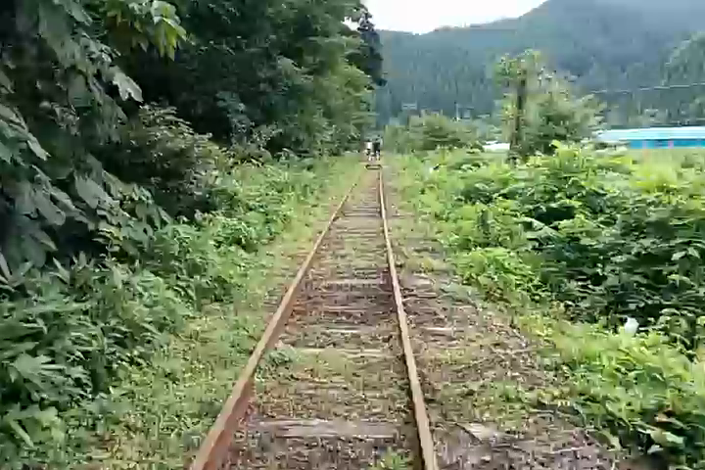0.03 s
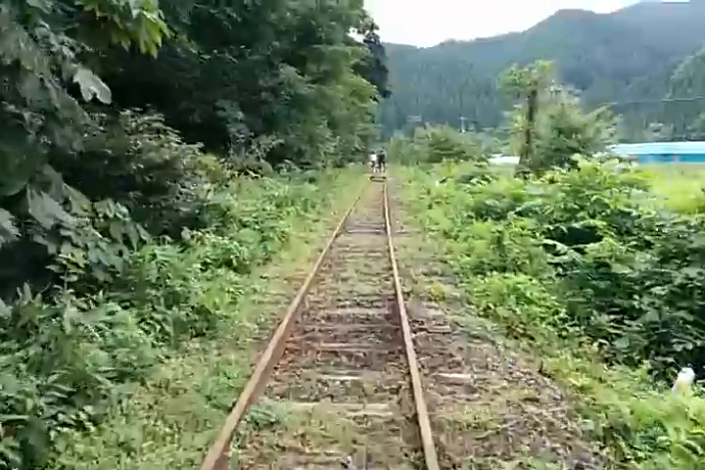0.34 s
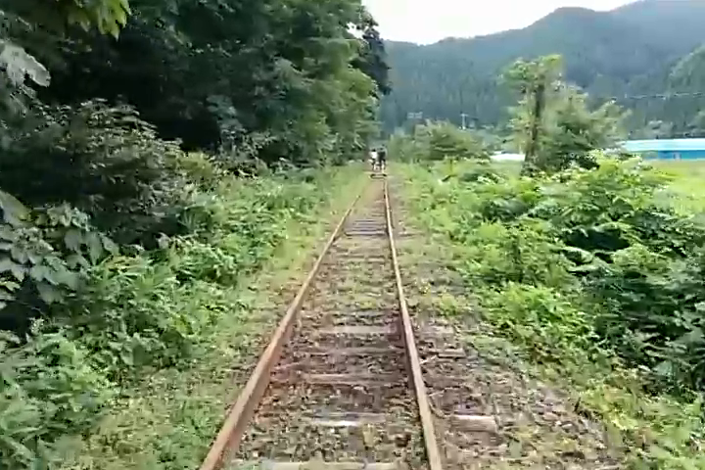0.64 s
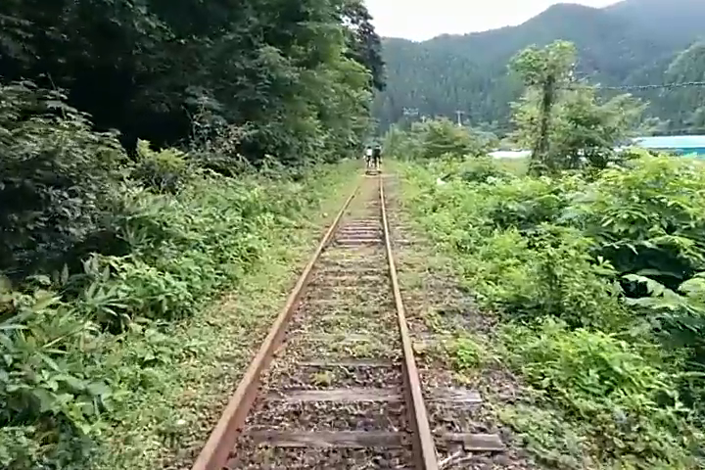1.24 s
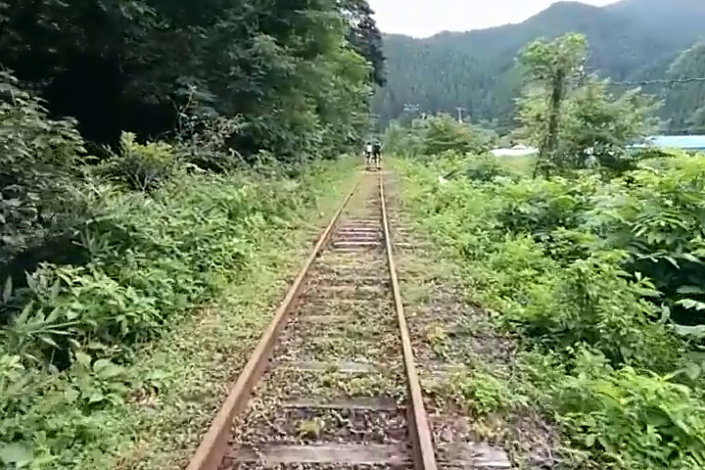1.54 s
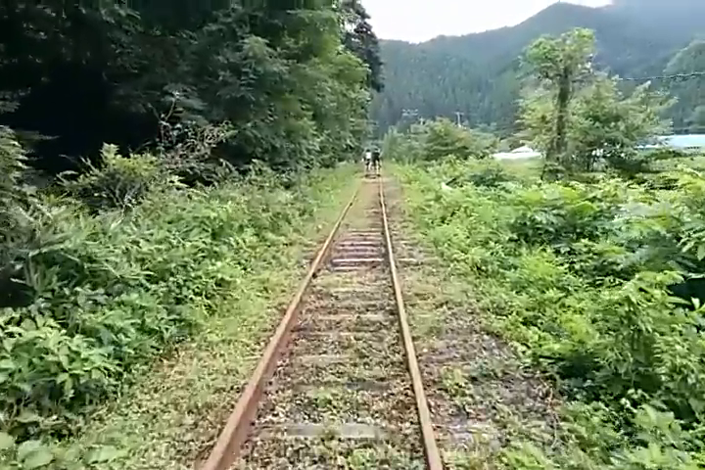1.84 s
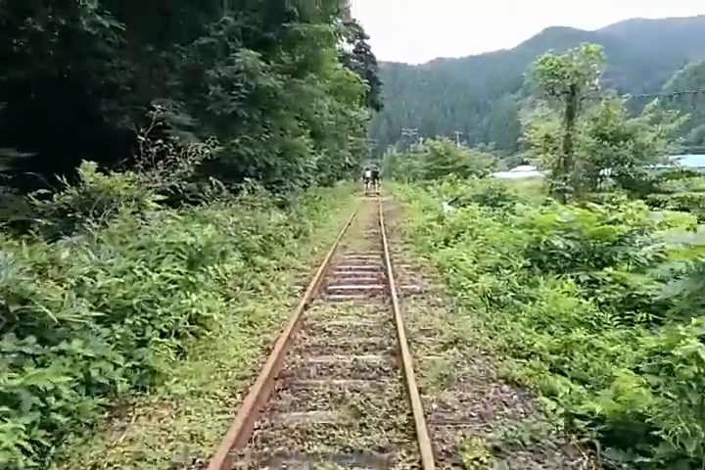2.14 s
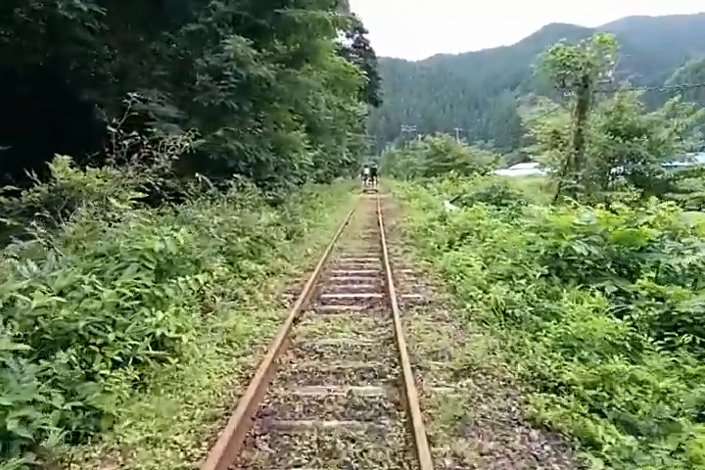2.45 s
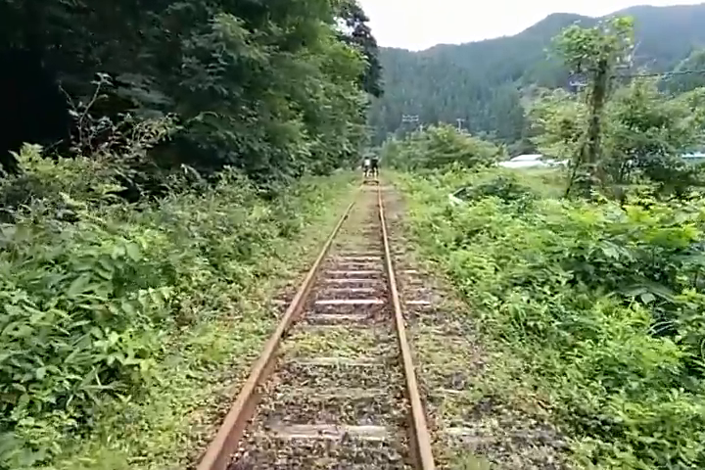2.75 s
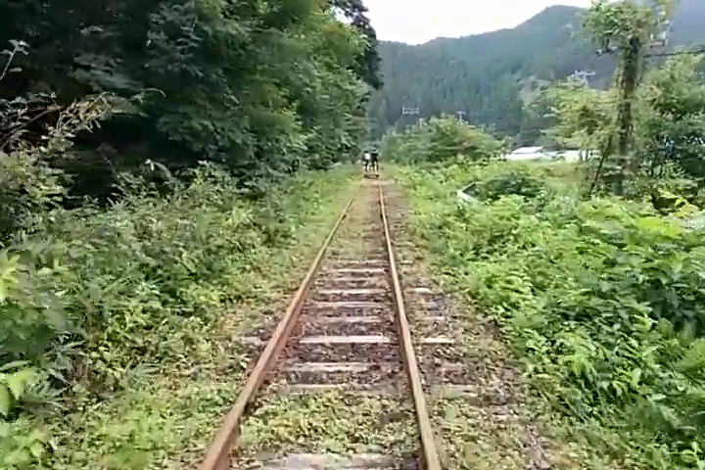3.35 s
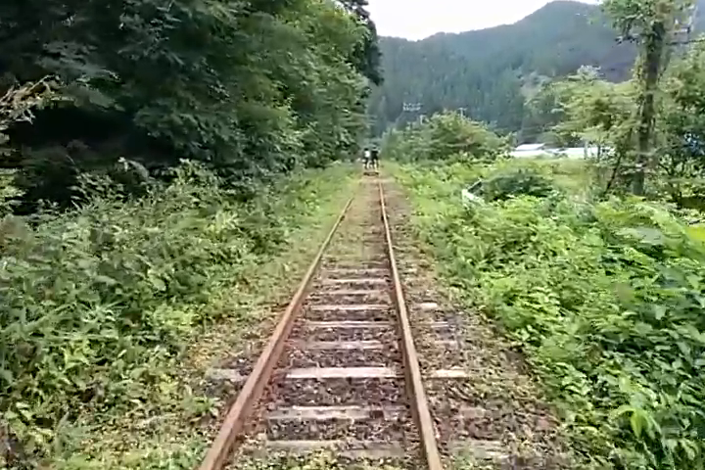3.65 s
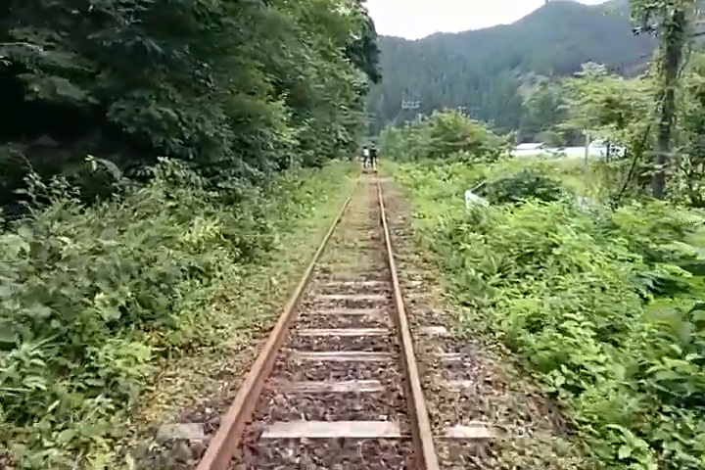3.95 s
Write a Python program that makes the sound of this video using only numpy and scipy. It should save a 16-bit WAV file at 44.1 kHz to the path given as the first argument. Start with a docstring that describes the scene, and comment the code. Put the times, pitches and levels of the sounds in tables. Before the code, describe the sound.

A rail bike rolls along rough track outdoors, heard from the seat as a wavering drone. Early on, two wheels clack over a joint, ringing and rattling. Loose fittings clink, wind hisses in gusts, and a lighter clatter comes last.

```python
"""A rail bike rolls along a rusty, overgrown track, heard from the seat. From the start, rough rail
forces the frame to drone and the steel wheels to sing faintly; soon loose fittings clink and wind
hisses past in short gusts. At about 0.5 s and 1 s the front and rear wheels strike one joint, and
each impact leaves the steel ringing and the frame rattling. Later the wind now and then thumps the
microphone. Near 3.7 s comes a lighter clatter, with a thin, ringing hiss in its wake."""
import sys
import numpy as np
from scipy import signal
from scipy.fft import rfft, irfft, next_fast_len
from scipy.io import wavfile
from scipy.ndimage import map_coordinates

SR = 44100
rng = np.random.default_rng(int(sys.argv[2]) if len(sys.argv) > 2 else 0)


def persist_wave(psi):
    """Save psi, clipped to +-1, as 16-bit WAV."""
    counts = np.round(np.clip(psi, -1, 1) * 32767).astype(np.int16)
    wavfile.write(sys.argv[1], SR, np.atleast_2d(counts).T)


N = 176400

# strength of the frame's drone: time_s, level_db
DRONE_LEVEL = [(.1, -49.5), (.18, -30), (.32, -28), (.39, -19.5), (.48, -19), (.68, -22.5), (.78, -17.5),
               (.92, -22), (1.02, -16), (1.16, -23), (1.27, -19.5), (1.43, -24), (1.57, -20), (1.7, -27),
               (1.97, -29), (2.14, -23), (2.36, -20.5), (2.45, -21.5), (2.6, -20.5), (2.85, -21),
               (3.02, -20.5), (3.13, -22.5), (3.28, -16), (3.47, -21), (3.7, -23), (3.8, -19.5),
               (3.88, -28), (4, -21)]
# centre of the hum: time_s, pitch_hz
DRONE_PITCH = [(0, 429.2), (.4, 406.2), (1, 395), (1.35, 431.1), (1.75, 416.9), (2.15, 487), (2.6, 484),
               (2.85, 457), (3.15, 482), (3.5, 446), (3.8, 438.6), (4, 458)]
# low roar relative to the drone: time_s, gain_db
ROAR_GAIN = [(0, -4.5), (.45, -9), (.62, -2.5), (1, -7.5), (1.35, -6), (1.7, -2), (2.1, -7.5), (2.35, -5),
             (2.8, -6), (3.2, -11), (3.8, -0.5), (4, -6)]
# broad response of the frame: frequency_hz, gain_db
FRAME_SPECTRUM = [(25, -49), (55, -36), (110, -31.5), (170, -21.5), (240, -4.5), (320, -2.5), (410, -0.5),
                  (520, -0.5), (620, -3), (760, -17.5), (1100, -22), (2000, -64)]
# grinding of the treads: time_s, level_db
GRIND_LEVEL = [(.1, -55.5), (.27, -42), (.45, -35), (.8, -32.5), (1.1, -33), (1.35, -34), (1.55, -37),
               (1.7, -37), (1.95, -33), (2.2, -33), (2.4, -30), (2.55, -31.5), (2.8, -30), (3.2, -29),
               (3.45, -29), (3.65, -29.5), (3.76, -25.5), (3.88, -29.5), (4, -25.5)]
# colour of the grinding: frequency_hz, gain_db
TREAD_SPECTRUM = [(400, -17.5), (750, 5), (1000, 0), (1350, -3.5), (1850, -4.5), (2150, -14.5), (2600, -12),
                  (3100, -12.5), (3800, -15), (4500, -23), (6000, -26.5), (15000, -54)]
# natural modes of a wheel: pitch_hz, struck_gain_db, t60_s, rolling_gain_db
WHEEL_MODES = [(1560, -10, 0.27, -1.5), (1936, 4.5, 0.21, 2), (2432, 5, 0.13, 5), (2837, -22, 0.054, 5),
               (2960, -21, 0.086, -2), (3510, -8, 0.25, -9.5)]
# steady airstream: time_s, level_db
AIR_LEVEL = [(.1, -72), (.15, -56), (.27, -53), (.7, -51), (1.15, -54.5), (1.3, -62.5), (1.55, -68),
             (1.8, -71), (1.83, -56.5), (2.4, -57), (2.9, -52.5), (3.2, -59.5), (3.48, -64.5),
             (3.67, -60.5), (4, -61)]
# colour of the airstream: frequency_hz, gain_db
AIR_SPECTRUM = [(3500, -21), (5000, -13), (6500, -1.5), (7700, 7), (9500, -1), (12000, -7), (15500, -11.5)]
# steady wind rumble: time_s, level_db
RUMBLE_LEVEL = [(.3, -63), (.7, -51), (1.35, -54.5), (1.6, -50), (2.4, -53), (3, -46), (4, -49.5)]
# wind thumps: start_s, hold_s, level_db
WIND_THUMPS = [(1.682, 0.043, -48.5), (2.06, 0.079, -47), (2.852, 0.044, -38.5), (3.185, 0.047, -48),
               (3.792, 0.043, -33.5)]
# colour of rumble and thumps: frequency_hz, gain_db
BUFFET_SPECTRUM = [(20, -29), (38, -21.5), (58, 1.5), (110, 0), (170, 3), (500, -53)]
# narrow dip in the treble: time_s, centre_hz
DIP_CENTRE = [(0, 5070), (.4, 5100), (.8, 4750), (1.3, 4210), (1.9, 4670), (3.1, 4460), (3.8, 5060)]
# clinks of loose metal: start_s, level_db, pitch_hz
FITTING_CLINKS = [(.238, -29, 975), (0.263, -31.5, 2440), (.385, -35, 1950), (.483, -31, 2420),
                  (0.767, -26.5, 1275), (.886, -25, 900), (1.012, -26, 1645), (1.285, -20.5, 972),
                  (1.676, -32.5, 2820), (2.386, -26, 1786), (2.405, -36, 3640), (2.789, -23, 967),
                  (2.896, -27.5, 2790), (2.934, -22, 824), (3.725, -20, 1149), (3.745, -31, 1604),
                  (3.752, -38, 2611), (3.964, -23, 971), (3.968, -32, 1733), (3.976, -33, 2725)]
# hissing gusts: start_s, hold_s, level_db, sag_db_per_s
WIND_GUSTS = [(0.29, 0.24, -42.5, 8), (0.514, 0.098, -30.5, 43), (0.603, 0.13, -38, 69),
              (0.752, 0.12, -46.5, 30), (0.898, 0.05, -51.5, 23), (0.96, 0.083, -36, 22.5),
              (1.033, .1, -40, 69.5), (1.966, 0.01, -44.5, 29.5), (2.395, 0.031, -44, 36),
              (2.427, 0.034, -47, 18), (2.568, 0.093, -42.5, 27.5), (2.659, 0.068, -43, 35),
              (2.767, 0.13, -44, 6), (2.888, .055, -48, 32.5), (3.001, 0.026, -35.5, 17.5),
              (3.031, 0.046, -39, 18.5), (3.07, 0.034, -43, 43), (3.286, 0.073, -43, 12),
              (3.512, 0.068, -50.5, 21.5), (3.713, 0.02, -47, -5), (3.765, 0.22, -52, 53),
              (3.886, 0.018, -41.5, 14)]
# colour of gusts and ticks: frequency_hz, gain_db
HISS_SPECTRUM = [(2500, -17), (4300, -6), (5200, -6.5), (6200, -6.5), (7800, 2.5), (10000, 0.5),
                 (12500, -7.5), (15500, -10)]
# tiny high ticks: start_s, level_db
HIGH_TICKS = [(.345, -42), (1.985, -46), (2.275, -50), (2.411, -38.5), (3.021, -39), (3.728, -39.5),
              (3.79, -39)]
# small bumps in the rail: start_s, hold_s, level_db, pitch_hz
RAIL_BUMPS = [(.359, 0.0068, -16, 365), (.427, 0.0056, -11.5, 437), (.444, .016, -11, 423),
              (.601, 0.0059, -12.5, 462), (.75, 0.013, -18.5, 400), (.779, 0.011, -12, 413),
              (.824, 0.0063, -15.5, 436), (.847, 0.0056, -11.5, 367), (1.022, 0.014, -12, 365),
              (1.09, 0.011, -10, 441), (1.236, 0.017, -21, 396), (1.288, 0.0073, -31, 430),
              (1.356, 0.0051, -11, 428), (1.508, 0.0074, -13, 463), (1.545, 0.0039, -6.5, 462),
              (1.561, .016, -21.5, 398), (1.601, 0.0058, -15.5, 457), (1.805, .009, -17.5, 342),
              (1.894, 0.0088, -18, 455), (2.117, 0.02, -16, 450), (2.192, 0.0081, -16.5, 494),
              (2.262, 0.014, -19.5, 328), (2.321, .016, -11.5, 496.7), (2.387, 0.0087, -11.5, 400),
              (2.492, .015, -13, 488), (2.515, 0.0051, -12, 493), (2.596, 0.0073, -12.5, 430),
              (2.715, 0.0048, -11.5, 449.4), (2.773, 0.011, -16.5, 412), (2.905, 0.0073, -13.5, 453),
              (2.945, 0.008, -11.5, 454), (3.047, 0.014, -12, 487), (3.1, 0.025, -11.5, 461),
              (3.141, .017, -7.5, 490), (3.351, .015, -13, 467.3), (3.506, 0.024, -20, 449),
              (3.558, 0.0077, -9, 446), (3.595, 0.0052, -10.5, 421), (3.619, 0.015, -15, 358),
              (3.691, .008, -10.5, 402), (3.759, 0.0047, -6, 450), (3.78, 0.019, -13, 423),
              (3.809, 0.007, -9, 445)]
# two clacks at the joint, then a lighter clatter: start_s, blow_db, ring_db, rattle_db, thud_db
IMPACTS = [(0.5193, -11.5, -36, -28.5, -14.5), (.961, -12.5, -31.5, -30.5, -18),
           (3.724, -20.5, -36.5, -39.5, -38)]
# colour of the blow: frequency_hz, gain_db
BLOW_SPECTRUM = [(30, -23.5), (120, -12), (260, 14), (400, 13), (650, 0.5), (1400, -9), (2700, -11.5),
                 (4000, -31), (8000, -36.5), (15000, -36)]
# colour of the frame's rattle: frequency_hz, gain_db
RATTLE_SPECTRUM = [(300, -21), (800, 1.5), (1500, 4), (2100, -10.5), (2600, -4.5), (3600, -3.5),
                   (4700, -20.5), (6000, -14), (7500, -14), (15000, -41)]
# bright ping of the rear wheel: pitch_hz, level_db, t60_s
PING_MODES = [(4660, -33, 0.055), (6720, -37, 0.18), (9000, -37, 0.065)]
# loose parts falling back: start_s, level_db
PART_REBOUNDS = [(0.527, -28), (0.544, -34), (.564, -32), (.589, -32), (0.609, -33), (.977, -32.5),
                 (1.011, -33)]
# colour of the rebounds: frequency_hz, gain_db
REBOUND_SPECTRUM = [(700, -9), (1600, 1), (2100, 0), (2700, 6.5), (3700, -4.5), (4800, -11.5), (6300, -2),
                    (9000, -15.5), (15000, -17)]
# ringing hiss at the last clatter: time_s, level_db
RINGING_HISS_LEVEL = [(3.67, -84), (3.7, -50.5), (3.735, -33), (3.77, -47), (3.795, -41.5), (3.87, -56.5),
                      (3.91, -55.5), (4, -47.5)]
# colour of that hiss: frequency_hz, gain_db
RINGING_HISS_SPECTRUM = [(4000, -18), (5100, -10.5), (5950, 10.5), (6500, -2), (7100, -8), (8300, 5.5),
                         (9500, -4), (11000, 1), (12500, -9), (15500, -7.5)]


def amp(db):
    """Decibels to amplitude ratio."""
    return 10 ** (np.asarray(db) / 20)


def unit(x):
    """Scale to rms 1."""
    return x / np.sqrt(np.mean(x ** 2) + 1e-20)


def clock():
    """Time of every sample in seconds."""
    return np.arange(N) / SR


def curve(rows):
    """Linear interpolation of (time_s, value) points at every sample."""
    return np.interp(clock(), *np.transpose(rows))


def wobble(rate):
    """Smooth random modulation: a spline through rate knots a second."""
    return map_coordinates(rng.standard_normal(int(N * rate / SR) + 4), [np.arange(N) * rate / SR])


def filtered(x, response):
    """Linear filtering: the spectrum of x times a frequency response."""
    size = next_fast_len(N + SR // 2)
    return irfft(rfft(x, size) * response(np.fft.rfftfreq(size, 1 / SR)), size)[:N]


def coloured(x, spectrum):
    """Spectral shaping by (frequency_hz, gain_db) points; rms 1."""
    knots_hz, db = np.transpose(spectrum)
    return unit(filtered(x, lambda hz: amp(np.interp(np.log(hz + 1), np.log(knots_hz), db))))


def noise(spectrum):
    """Coloured Gaussian noise; rms 1."""
    return coloured(rng.standard_normal(N), spectrum)


def resonance(hz, half_width_hz):
    """A resonance under random excitation gives narrow-band noise; rms 1."""
    return unit(filtered(rng.standard_normal(N), lambda f: 1 / (1 + ((f - hz) / half_width_hz) ** 2)))


def grit(per_s, spread_db, smooth):
    """Shot noise: tiny random impacts over a share of smooth noise; rms 1."""
    hits = (rng.random(N) < per_s / SR) * np.sign(rng.standard_normal(N))
    sizes = amp(spread_db * np.clip(rng.standard_normal(N), -2, 2))
    return unit(unit(hits * sizes) + smooth * rng.standard_normal(N))


def envelope(start, rise, hold, t60):
    """Linear rise, with exponential decay from start + hold; all in seconds."""
    t = clock() - start
    return np.clip(t / rise, 0, 1) * amp(-60 * np.maximum(t - hold, 0) / t60)


def tone(start, hz, jitter_rad=0):
    """A sinusoid; phase jitter broadens its spectral line."""
    return np.sin(2 * np.pi * hz * (clock() - start) + jitter_rad)


def chinks(pitches, t60, spread_db, rise=0.006):
    """Damped oscillations, one per pitch in turn, scattered in time and size; rms 1."""
    t = np.arange(SR // 16) / SR
    count = len(pitches)
    size, phase, delay = np.hsplit(rng.random((count, 3)), 3)
    envelopes = amp(spread_db * size - 60 * t / t60) * (1 - np.exp(-t / rise))
    rings = envelopes * np.sin(2 * np.pi * (pitches[:, None] * t + phase))
    starts = ((np.arange(count)[:, None] + 2 * delay) * N / count).astype(int)
    return unit(np.bincount((starts + np.arange(len(t))).ravel(), rings.ravel(), N)[:N])


def frame_drone(half_width_hz=32, skirt_hz=110, scatter_hz=58, ring_count=300):
    """Forced vibration: rough rail drives a wandering hum, short rings around it and a broad roar."""
    centre_hz = curve(DRONE_PITCH)
    phase = 2 * np.pi * np.cumsum(centre_hz) / SR
    lowpass = lambda hz: 1 / (1 + 1j * hz / half_width_hz) / (1 + (hz / skirt_hz) ** 4)
    sway = [unit(filtered(rng.standard_normal(N), lowpass)) for _ in range(2)]
    hum = unit(sway[0] * np.cos(phase) + sway[1] * np.sin(phase))
    detune_hz = scatter_hz * rng.standard_normal(ring_count)
    pitches = centre_hz[np.arange(ring_count) * N // ring_count] + detune_hz
    rings = chinks(pitches, t60=0.13, spread_db=9)
    roar = coloured(grit(per_s=260, spread_db=3.5, smooth=0.98), FRAME_SPECTRUM)
    gain = amp(curve(DRONE_LEVEL) + 1.7 * wobble(50))
    return gain * (amp(-8.5) * hum + amp(-3) * rings + amp(curve(ROAR_GAIN)) * roar)


def treads(detune=0.0265):
    """Rolling contact: grit crunches, loose metal chatters, and the wheel modes chink and sing."""
    grains = grit(per_s=450, spread_db=-0.5, smooth=0.76)
    crunch = coloured(grains * amp(1.3 * wobble(70)), TREAD_SPECTRUM)
    loose_metal = chinks(rng.uniform(661, 4300, size=2600), t60=0.05, spread_db=13)
    chatter = coloured(loose_metal, TREAD_SPECTRUM)
    chink = unit(sum(amp(db) * chinks(hz * (1 + detune * rng.standard_normal(170)), 0.042, spread_db=11)
                     for hz, _, _, db in WHEEL_MODES))
    sing = unit(sum(amp(db + 8.7 * wobble(22.026)) * resonance(hz, half_width_hz=83)
                    for hz, _, _, db in WHEEL_MODES))
    gain = amp(curve(GRIND_LEVEL) + 1.9 * wobble(24.665))
    return gain * (amp(-9) * crunch + amp(-5) * chatter + amp(-12.5) * chink + amp(-15.5) * sing)


def airstream():
    """Flow noise: passing air makes a thin, fluttering hiss."""
    return amp(curve(AIR_LEVEL) + 2.4 * wobble(60)) * noise(AIR_SPECTRUM)


def buffeting():
    """Pressure fluctuations of wind on the microphone give a low rumble and occasional thumps."""
    thumps = sum(amp(db) * envelope(start, 0.005, hold, t60=0.21) for start, hold, db in WIND_THUMPS)
    return (amp(curve(RUMBLE_LEVEL)) + thumps) * noise(BUFFET_SPECTRUM)


def treble_dip(x, half_width_hz=626, centre_db=-11):
    """Band rejection: a slowly drifting notch separates the rolling from the hiss."""
    hz, t, spectra = signal.stft(x, SR, nperseg=512)
    offset = (hz[:, None] - np.interp(t, *np.transpose(DIP_CENTRE))) / half_width_hz
    return signal.istft(spectra * amp(centre_db * np.exp(-offset ** 2)), SR, nperseg=512)[1][:N]


def clinks():
    """Free vibration: loose fittings ring briefly, each at its own pitch."""
    jitter_rad = 0.5 * wobble(250)
    return sum(amp(db) * envelope(start, rise=0.006, hold=0.0052, t60=0.082) * tone(start, hz, jitter_rad)
               for start, db, hz in FITTING_CLINKS)


def gusts(flutter_db=1.2):
    """Incoherent addition: gusts sum in power, rustling with fine crackle and tiny high rings."""
    power = np.zeros(N)
    for start, hold, db, sag_db_per_s in WIND_GUSTS:
        level_db = db - sag_db_per_s * np.clip(clock() - start, 0, hold)
        power += (amp(level_db) * envelope(start, 0.028, hold, t60=0.11)) ** 2
    flutter = amp(flutter_db * (wobble(45) + wobble(170)))
    rings = chinks(rng.uniform(5500, 14000, size=1600), t60=0.035, spread_db=12)
    crackle = grit(per_s=1500, spread_db=3, smooth=0.9)
    return np.sqrt(power) * flutter * coloured(crackle + 0.5 * rings, HISS_SPECTRUM)


def ticks():
    """Transients: very short bursts of high noise are heard as dry ticks."""
    bursts = sum(amp(db) * envelope(start, rise=0.001, hold=0.0023, t60=0.036) for start, db in HIGH_TICKS)
    return bursts * noise(HISS_SPECTRUM)


def bumps():
    """Impulse response: each small bump in the rail draws a heavily damped knock from the frame."""
    jitter_rad = 0.59 * wobble(60)
    return sum(amp(db) * envelope(start, 0.0044, hold, t60=0.032) * tone(start, hz, jitter_rad)
               for start, hold, db, hz in RAIL_BUMPS)


def steel_ring(start, hz, rise, hold, t60):
    """Modal decay: one mode of a struck wheel dies away, roughened by phase jitter."""
    return envelope(start, rise, hold, t60) * tone(start, hz, jitter_rad=0.7 * wobble(280))


def clacks():
    """Impact excitation: a wheel's blow brings a thud, a rattling frame and ringing steel."""
    out = np.zeros(N)
    wash = noise(RATTLE_SPECTRUM)
    contacts = chinks(rng.uniform(640, 4133, size=2400), t60=0.02, spread_db=8, rise=0.00042)
    rattle = unit(wash + coloured(contacts, RATTLE_SPECTRUM))
    for start, blow_db, ring_db, rattle_db, thud_db in IMPACTS:
        out += amp(blow_db) * envelope(start, rise=0.0011, hold=0.0087, t60=0.097) * noise(BLOW_SPECTRUM)
        out += amp(thud_db) * envelope(start, rise=0.0012, hold=0.0078, t60=0.083) * tone(start, hz=249)
        out += amp(rattle_db) * envelope(start, rise=0.0033, hold=0.073, t60=0.51) * rattle
        for hz, mode_db, t60, _ in WHEEL_MODES:
            gain = amp(ring_db + mode_db + rng.normal(0, 1))
            out += gain * steel_ring(start, hz, rise=0.011, hold=0.019, t60=t60)
    return out


def rebounds():
    """Secondary impacts: loose parts fall back with bright knocks after both clacks at the joint."""
    bursts = sum(amp(db) * envelope(start, rise=0.0012, hold=0.0039, t60=0.081)
                 for start, db in PART_REBOUNDS)
    return bursts * noise(REBOUND_SPECTRUM)


def rear_wheel_landing(ping_s=0.96, jolt_s=0.9635):
    """Shock excitation: the landing rings the rear wheel's high modes and jolts the frame."""
    ping = sum(amp(db) * steel_ring(ping_s, hz, rise=0.0059, hold=0.012, t60=t60)
               for hz, db, t60 in PING_MODES)
    jolt = envelope(jolt_s, rise=0.0051, hold=0.0037, t60=0.008) * tone(jolt_s, hz=174)
    return ping + amp(-13.5) * jolt


def ringing_hiss():
    """Spectral peaks lend a ringing quality to the thin hiss that trails the last clatter."""
    return amp(curve(RINGING_HISS_LEVEL) + 1.8 * wobble(80)) * noise(RINGING_HISS_SPECTRUM)


def scene():
    """Superposition: all sources ride along with the listener and add in one channel."""
    structure = frame_drone() + bumps() + clacks() + rear_wheel_landing() + rebounds() + clinks()
    rush = treads() + gusts() + airstream() + buffeting() + ringing_hiss() + ticks()
    return (structure + treble_dip(rush))[None]


def record(dry, start_s=0.076, fade_s=0.019, ceiling=0.66, top_hz=15800):
    """After a fade-in, soft saturation rounds the highest peaks and a low-pass limits the band."""
    faded = dry[0] * np.clip((clock() - start_s) / fade_s, 0, 1)
    rounded = faded / (1 + (faded / ceiling) ** 8) ** (1 / 8)
    return filtered(rounded, lambda hz: hz < top_hz)[None]


dry = scene()
out = record(dry)
persist_wave(out)
```